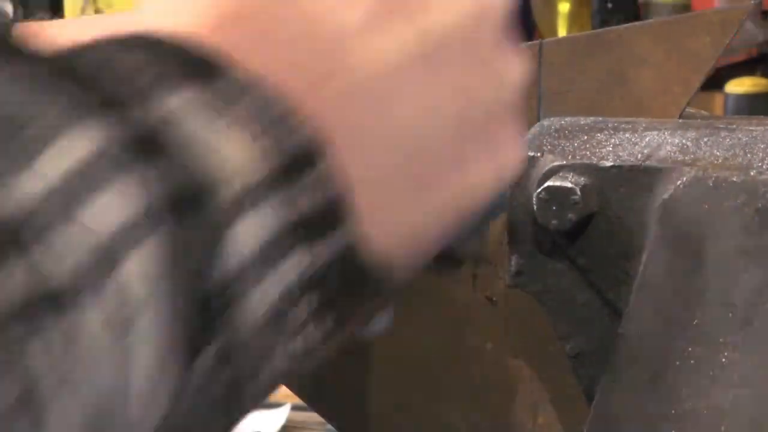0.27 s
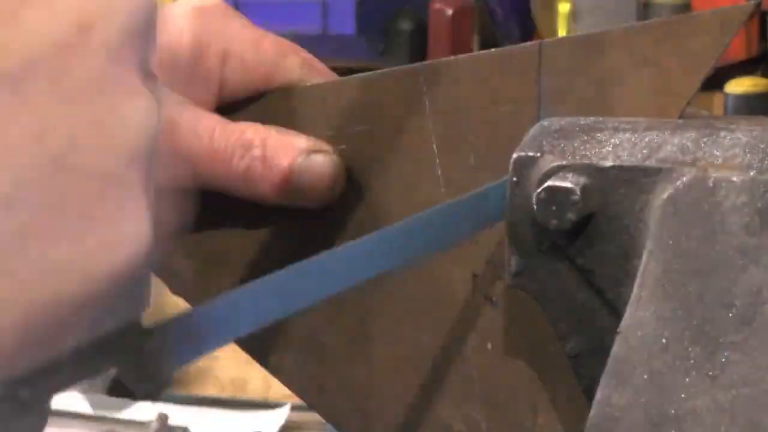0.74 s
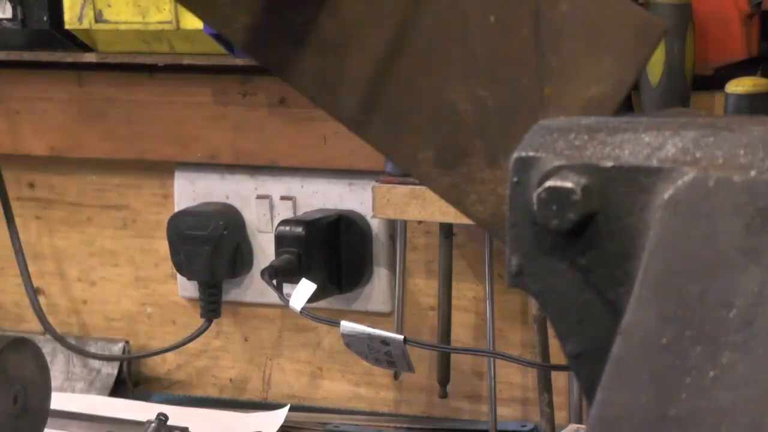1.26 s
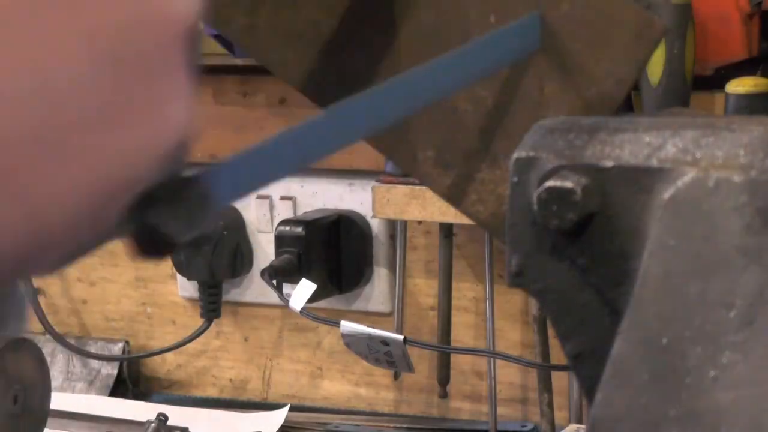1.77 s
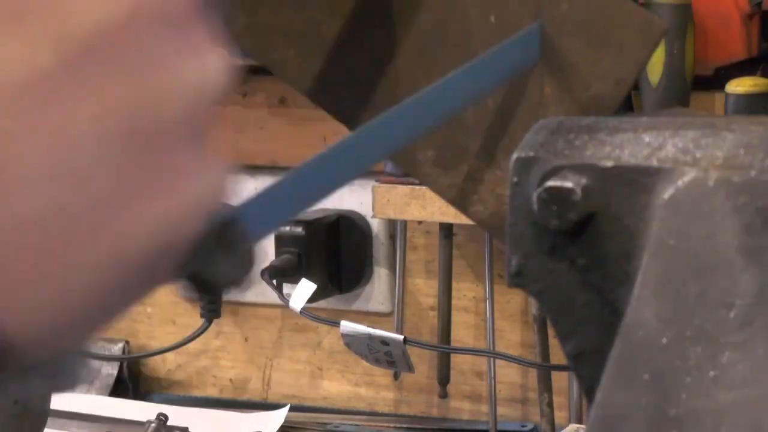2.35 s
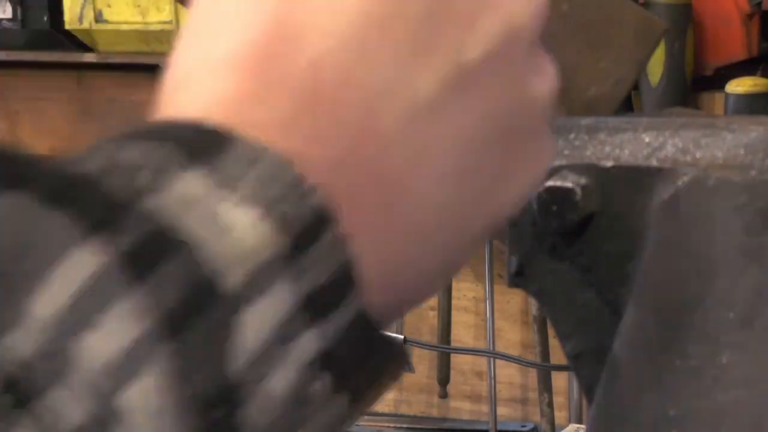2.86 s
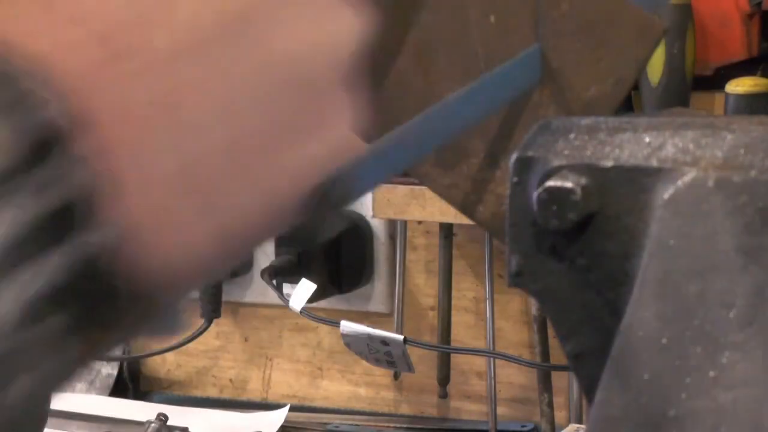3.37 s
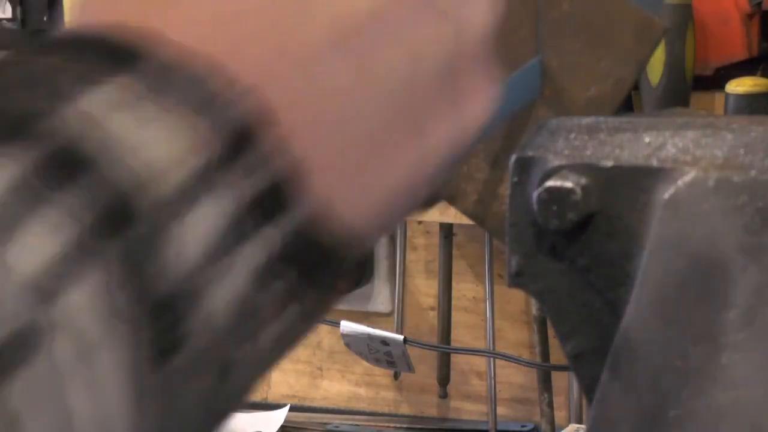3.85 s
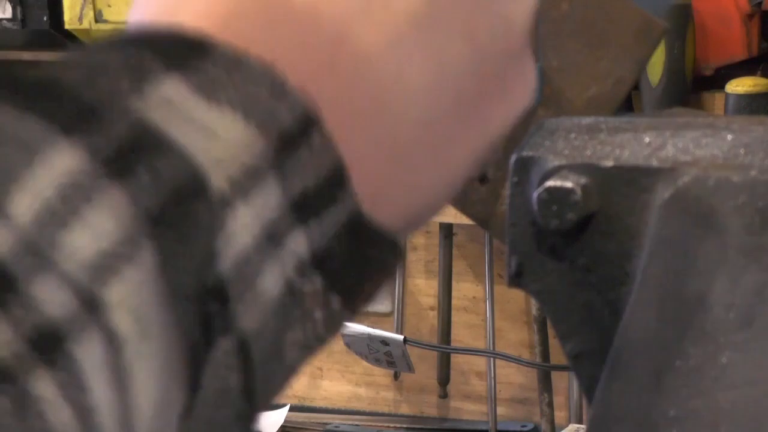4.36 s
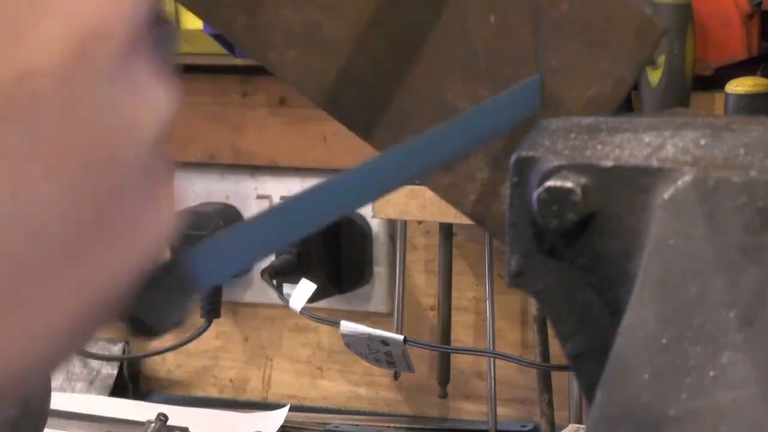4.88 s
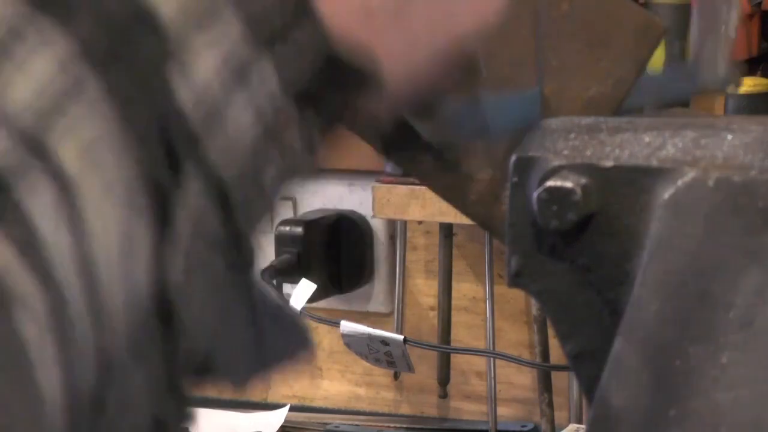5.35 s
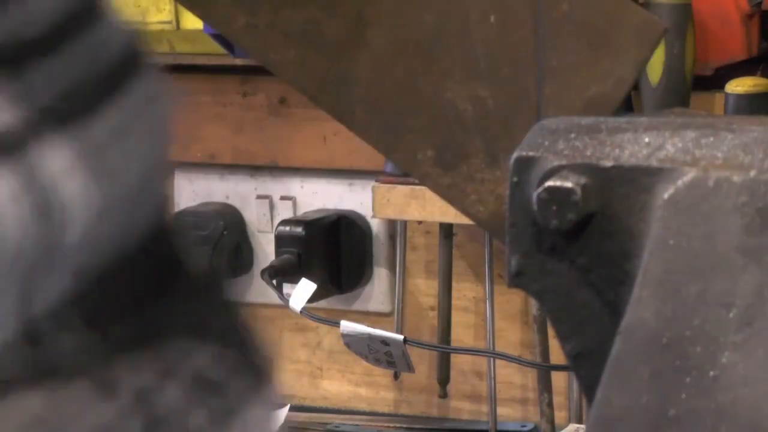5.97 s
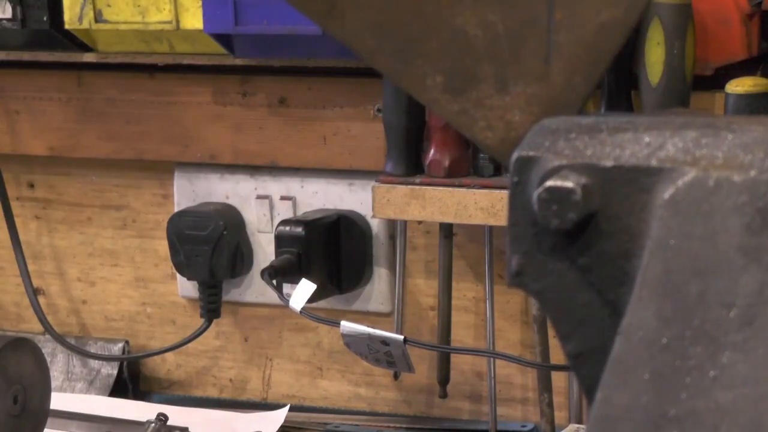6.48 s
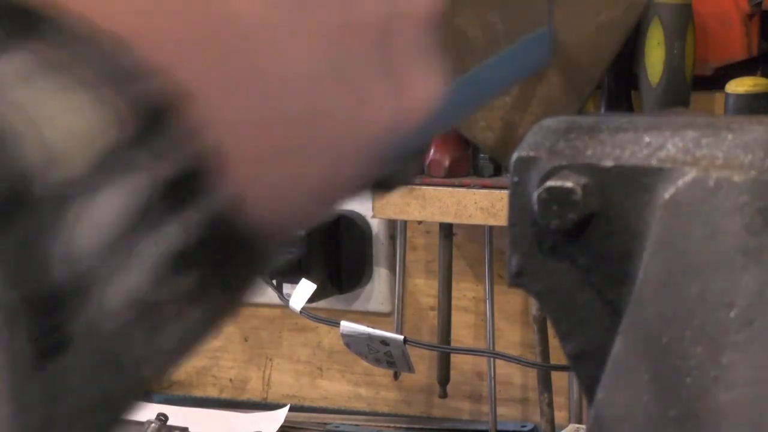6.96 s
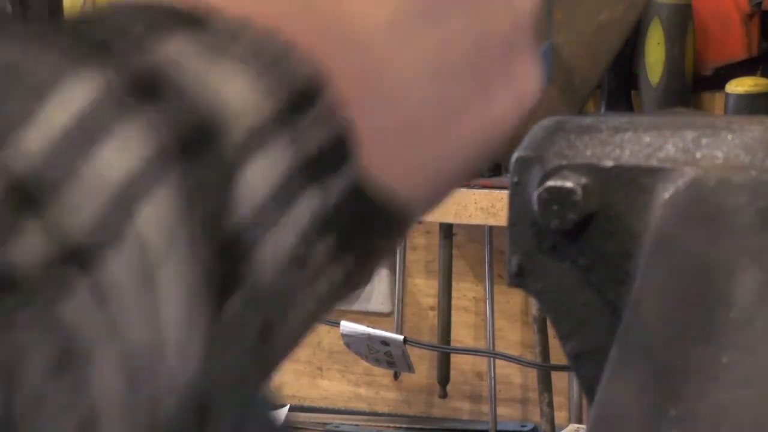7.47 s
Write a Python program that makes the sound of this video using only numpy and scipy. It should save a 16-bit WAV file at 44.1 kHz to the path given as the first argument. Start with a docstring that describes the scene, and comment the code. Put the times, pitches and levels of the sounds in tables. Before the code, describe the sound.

A hacksaw cuts steel plate in very fast, sped-up rasping strokes with metallic ringing, pausing twice for light knocks.

```python
"""A hacksaw cuts a steel plate held in a vise, in sped-up back-and-forth strokes, about 32 a second.
The teeth rasp; their friction makes blade and plate sing in modes that shift as the cut deepens,
and the blade squeals where it catches. Between cuts the steel is knocked about or left to ring,
with soft sleeve rustles and faint clicks. Heard from close by in a small, quiet workshop."""
import sys
import numpy as np
from scipy import signal
from scipy.fft import rfft, irfft
from scipy.io import wavfile
from scipy.ndimage import uniform_filter1d

SR = 44100
rng = np.random.default_rng(int(sys.argv[2]) if len(sys.argv) > 2 else 0)


def bounce(signal):
    """Save signal as a 16-bit WAV file at the path given by the first command-line argument."""
    frames = np.transpose(np.atleast_2d(signal))
    limited = np.clip(frames, -1, 1)
    pcm = np.round(limited * 32767).astype(np.int16)
    wavfile.write(sys.argv[1], SR, pcm)


N = 340452
TIME = np.arange(N) / SR
FREQS = np.arange(N // 2 + 1) * SR / N


def undb(db):
    """Decibels to gain."""
    return 10 ** (np.asarray(db) / 20)


def unit(x):
    """Scale to rms 1."""
    return x / np.sqrt(np.mean(np.abs(x) ** 2))


def along(points):
    """Interpolate (frequency [Hz], value) rows over log frequency."""
    hz, value = np.transpose(points)
    return np.interp(np.log(FREQS + 1), np.log(hz), value)


def colour(x, spectrum):
    """Filter by a spectrum, to rms 1."""
    return unit(irfft(rfft(x) * undb(along(spectrum)), N))


def noise():
    """White noise."""
    return rng.standard_normal(N)


def walk(rate_hz):
    """Smooth random drift, rms 1."""
    size = max(int(SR / rate_hz), 1)
    return unit(uniform_filter1d(uniform_filter1d(noise(), size), size))


def linger(force, fall_s):
    """Envelope whose stored power falls 30 dB in fall_s."""
    keep = np.exp(-np.log(1000) / (fall_s * SR))
    return np.sqrt(signal.lfilter([1 - keep], [1, -keep], force ** 2))


def swells(times_s, lengths_s, levels_db, rise_shape=2.9, fall_shape=2.6):
    """Envelope of rounded pushes; length is the time above half power."""
    power = np.zeros(N)
    for s, length, db in zip(times_s, lengths_s, levels_db):
        near = slice(max(int((s - 3 * length) * SR), 0), int((s + 3 * length) * SR))
        away = 2 * (TIME[near] - s) / length
        shape = np.where(away < 0, rise_shape, fall_shape)
        power[near] += undb(db) ** 2 * .5 ** (np.abs(away) ** shape)
    return np.sqrt(power)


def resonate(x, hz, width_hz):
    """Damped mode, gain 1 at its centre."""
    return signal.lfilter(*signal.iirpeak(hz, hz / width_hz, fs=SR), x)


def friction_mode(hz, width_hz, lock, smooth_samples=110):
    """Friction-fed mode, hz given per sample: the phase wanders; lock (0-1) evens the amplitude."""
    pole = np.exp(-np.pi * width_hz / SR)
    drive = rng.standard_normal(len(hz)) + 1j * rng.standard_normal(len(hz))
    phasor = signal.lfilter([1], [1, -pole], drive)
    phasor = uniform_filter1d(phasor / np.abs(phasor) ** lock, smooth_samples)
    return unit(np.real(phasor * np.exp(2j * np.pi * np.cumsum(hz) / SR)))


# stroke timing per spell of sped-up sawing: (time [s], stroke number)
OPENING = [(0.025, 0), (0.81, 24), (0.968, 29)]
LEAD_IN = [(1.825, 0), (1.915, 3)]
LONG_RUN = [(1.986, 1), (2.385, 14), (2.863, 30), (3.316, 46), (3.491, 52), (3.806, 62), (4.11, 72)]
SECOND_RUN = [(4.231, 0), (4.301, 2), (5.159, 30), (5.475, 40), (5.528, 42)]
SHORT_RUN = [(5.66, 0), (5.977, 10), (6.008, 11)]
CLOSING = [(7.096, 0), (7.204, 4), (7.706, 21)]
# spells: (timing, nominal push [s], nominal pull [s], pull lead [s],
# pull over push in rasp [dB], in low tone [dB], in upper ring [dB])
SPELLS = [(OPENING, 0.016, 0.01, 0.0058, 5, 15.7, 6.7), (LEAD_IN, 0.015, .015, 0.0011, 1.1, -0.5, 0.98),
          (LONG_RUN, 0.015, 0.012, 0.00089, 2.9, 1.7, 0.53),
          (SECOND_RUN, 0.016, 0.013, 0.0031, 2.1, -1.4, 0.88),
          (SHORT_RUN, 0.015, 0.015, 0.0038, 4.3, 2.5, 0), (CLOSING, .014, 0.012, .002, 0.46, 20.7, 0.6)]
# bearing down and easing: (time [s], rasp drive [dB], low tone drive [dB], upper ring drive [dB])
EFFORT = [(0.02, -47, -61.5, -38), (0.25, -47.5, -55.5, -36.5), (0.65, -43, -55.5, -33),
          (0.87, -48.5, -54, -36), (0.97, -53.0, -66, -46.5), (1.81, -48.5, -31, -41),
          (1.92, -41, -39, -39.5), (1.98, -45, -37, -39), (2.25, -44.5, -37.0, -39.5),
          (2.5, -46.0, -33, -38.5), (2.65, -46.5, -38.5, -40.5), (3.1, -44.5, -36.5, -39.5),
          (3.299, -44, -37.5, -37.0), (3.479, -45.5, -38, -32.5), (3.8, -44, -38, -31),
          (4.11, -45.5, -42, -32.5), (4.22, -44.5, -46.5, -34), (4.4, -45.5, -43.5, -30),
          (4.6, -42.5, -39, -31), (4.95, -44.5, -37.5, -34), (5.25, -48.5, -34.5, -32.5),
          (5.42, -45.5, -42.5, -37), (5.531, -46, -39, -35), (5.65, -45, -41, -32),
          (5.801, -48.5, -46, -31), (6.01, -40.5, -45.5, -36.5), (7.09, -43, -54, -36.5),
          (7.22, -43, -52, -31.0), (7.4, -44, -63.5, -33.5), (7.71, -45, -57, -37)]


def strokes(timing, push_s, pull_s, lead_s, *accents_db, jitter_s=0.00089, length_spread=0.11):
    """One spell of pushes (even) and pulls (odd), no two alike; rows as in TOUCHES."""
    times, numbers = np.transpose(timing)
    number = np.arange(numbers[0], numbers[-1] + 1)
    pull = number % 2
    late, longer, *harder = rng.standard_normal(size=(len(number), 5)).T
    centre_s = np.interp(number, numbers, times) - lead_s * pull + jitter_s * late
    length_s = np.where(pull, pull_s, push_s) * np.exp(length_spread * longer)
    effort_s, *efforts_db = np.transpose(EFFORT)
    spreads_db = 0.86, 3, 1.4  # rasp, low tone, upper ring
    drives_db = [np.interp(centre_s, effort_s, effort) + accent * (pull - .5) + spread * chance
                 for effort, accent, spread, chance in zip(efforts_db, accents_db, spreads_db, harder)]
    return np.transpose([centre_s, length_s, *drives_db])


# blade being set into the cut:
# (centre [s], nominal length [s], rasp drive [dB], low tone drive [dB], upper ring drive [dB])
TOUCHES = [(1.575, 0.009, -40.5, -33, -46), (1.658, 0.0075, -67.5, -48.5, -62.5),
           (1.788, 0.0046, -50, -37, -55), (1.968, 0.011, -52, -46, -46),
           (6.968, 0.011, -46.5, -48.5, -36.5), (7.004, 0.0081, -52.5, -43, -32.5),
           (7.065, 0.0069, -39.5, -52, -41)]


def sawing(stroke_rows, judder_db=1.33, judder_hz=130):
    """Strokes and touches drive rasp and modes; the blade judders as its teeth catch and slip."""
    centre_s, length_s, rasp_db, low_db, ring_db = np.vstack([stroke_rows, TOUCHES]).T
    judder = unit(undb(judder_db * walk(judder_hz)))
    scrape = rasp(judder * swells(centre_s, 1.08 * length_s, rasp_db))
    low = low_tone(swells(centre_s, length_s, low_db))
    ring = upper_ring(judder * swells(centre_s, 1.03 * length_s, ring_db))
    return scrape + low + ring + plate(scrape)


# teeth on steel: (frequency [Hz], relative density [dB])
RASP_SPECTRUM = [(40, -11), (120, -3), (350, 1), (520, 2), (750, 10), (1100, 5.5), (1500, 5), (3500, 9.5),
                 (5500, 7.5), (8000, 1.5), (12000, 2), (16000, -1)]


def rasp(force, grit_db=3.5, chips_per_s=900, chip_db=-9, patchy_db=2.5, tail_db=-12, gain_db=7):
    """Teeth tear the steel: uneven grinding, snaps as chips break off, a flickering colour."""
    grind = unit(noise() * undb(grit_db * walk(500)))
    chips = unit(noise() * (rng.random(N) < chips_per_s / SR))
    spectrum = rfft(colour(grind + undb(chip_db) * chips, RASP_SPECTRUM))
    octave = np.clip(np.log2(FREQS / 600 + 1e-9), 0, 4)
    bands = [irfft(spectrum * np.maximum(1 - np.abs(octave - k), 0), N) for k in range(5)]
    bite = unit(sum(band * undb(patchy_db * walk(60)) for band in bands))
    tail = undb(tail_db) * linger(force, fall_s=0.027) * colour(noise(), RASP_SPECTRUM)
    return undb(gain_db) * (force * bite + tail)


# bending mode of the long cut: (time [s], pitch [Hz])
BENDING_PITCH = [(1.55, 977.4), (2.1, 951), (3.0, 938.6), (3.55, 923.4), (3.8, 965), (4.05, 997),
                 (4.5, 972), (5.0, 965), (5.5, 936), (6.0, 907)]


def low_tone(force, long_from_s=1.2, long_to_s=6.5, growl_db=-4, gain_db=4):
    """The long cut excites a strong, rough bending mode; the short cuts give only a dull growl."""
    pitch_hz = np.interp(TIME, *np.transpose(BENDING_PITCH))
    tone = friction_mode(pitch_hz, width_hz=42, lock=.65, smooth_samples=190)
    growl = friction_mode(np.full(N, 860.), width_hz=270, lock=0.16, smooth_samples=50)
    long_cut = (TIME > long_from_s) & (TIME < long_to_s)
    voice = np.where(long_cut, tone, undb(growl_db) * growl)
    return undb(gain_db) * voice * linger(force, fall_s=0.014)


# upper modes of blade and plate: (frequency [Hz], nominal width [Hz], relative density [dB])
FIRST_CUT = [(1846, 57, 7.5), (2466, 87, -5), (3574, 550, -8), (4480, 170, -3.5), (4960, 28, -8),
             (5240, 75, -8.5)]
SHALLOW = [(1277, 570, -10), (2363, 100, 3.5), (3440, 135, -1.5), (3770, 140, 4), (4860, 130, 5),
           (6400, 250, -5), (7640, 370, -4), (9700, 250, -16), (12500, 180, -15.5)]
HALFWAY = [(2303, 47, -10.5), (3764, 44, -13.5), (3990, 42, -8), (4600, 110, -13.5), (6220, 120, -21),
           (6850, 88, -31.5), (9940, 1500, -43), (12320, 250, -45.5)]
DEEP = [(1550, 130, -33), (2293, 70, -8), (2750, 27, -15), (3760, 25, -3), (3970, 60, 1),
        (4560, 64.3, -3.5), (6035, 130, -8), (7200, 130, -20), (9560, 220, -21.5), (11600, 130, -22),
        (12700, 160, -24)]
NEARLY_THROUGH = [(2247, 49, -10), (2930, 14, -12), (3370, 83, -10.5), (3760, 40, -3), (3980, 69, 1.5),
                  (4527, 64, -4.5), (5590, 200, -15), (6720, 310, -19), (8980, 126, -17.5),
                  (9850, 98, -17.5), (11900, 435, -26.5)]
LAST_CUT = [(1580, 100, -10.5), (2224, 35, -1.5), (2990, 76, 1), (4063, 38, 2), (6000, 340, -22.5),
            (9030, 370, -23.5), (9440, 140, -16.5)]
# stages of the cut: (start [s], end [s], modes)
STAGES = [(0, 1.2, FIRST_CUT), (1.2, 3.3, SHALLOW), (3.3, 4.18, HALFWAY), (4.18, 5.05, DEEP),
          (5.05, 6.5, NEARLY_THROUGH), (6.5, 7.8, LAST_CUT)]


def upper_ring(force, width_scale=0.91, sag_hz_per_s=30, rivalry_db=4.5, rivalry_hz=70, gain_db=2):
    """Each stage's modes vie for the stroke's energy and sink as the kerf lengthens."""
    out = np.zeros(N)
    for start_s, end_s, modes in STAGES:
        crossfade = uniform_filter1d(1. * ((TIME >= start_s) & (TIME < end_s)), size=SR // 5)
        near = crossfade > 1e-6
        t = TIME[near]
        knots_s = np.arange(t[0], t[-1], 1 / rivalry_hz)
        sag_hz = sag_hz_per_s * (t - t.mean())
        voice, power = 0, 0
        for hz, width_hz, db in modes:
            grips = undb(db + rivalry_db * rng.standard_normal(len(knots_s))) * np.sqrt(width_hz)
            grip = np.interp(t, knots_s, grips)
            voice += grip * friction_mode(hz - sag_hz, width_scale * width_hz, lock=0.05)
            power += grip ** 2
        out[near] += voice * np.sqrt(crossfade[near] / power)
    return undb(gain_db) * out * linger(force, fall_s=0.011)


# blade catches: (time [s], pitch [Hz], relative level [dB])
SQUEALS = [(0.513, 1870, -32), (3.503, 2302, -24.5), (3.565, 2311, -24), (3.592, 3970, -32),
           (3.692, 2295, -28), (3.757, 2270, -24), (4.329, 3950, -27), (4.736, 1570, -36),
           (4.801, 1560, -39), (4.864, 1570, -34.5), (4.915, 4070, -28.5), (4.945, 4055, -31.5),
           (5.856, 1600, -40), (5.902, 2910, -31.5), (7.156, 2844, -24), (7.262, 2960, -23.5),
           (7.288, 2974, -29), (7.323, 2934, -25), (7.623, 4010, -24.5)]


def squeals(length_s=0.0089, gain_db=-2):
    """For part of a stroke the blade locks onto a single mode."""
    tones = sum(swells([s], [length_s], [db]) * np.sin(2 * np.pi * hz * TIME) for s, hz, db in SQUEALS)
    return undb(gain_db) * np.sqrt(2) * tones


# plate, saw and vise handled: (time [s], thud pitch [Hz], thud level [dB], contact drive [dB])
KNOCKS = [(1.033, 271, -41, -52.5), (1.052, 415, -50, -46), (1.066, 600, -42.5, -46),
          (1.248, 201, -36.5, -45), (1.271, 242, -36.5, -39), (1.293, 380, -40, -34.5),
          (1.521, 380, -67, -47.5), (1.554, 332, -46.5, -58), (3.328, 383, -37.5, -41.5),
          (6.099, 460, -38.5, -41.5), (6.108, 443, -43, -46), (6.133, 340, -41, -43),
          (6.21, 545, -46, -41.5), (6.219, 537, -37, -54), (6.227, 188, -44.5, -59),
          (6.284, 189, -47.5, -61), (6.415, 576, -55, -77), (6.714, 197, -45, -51),
          (6.727, 230, -39.5, -39.5), (6.756, 267, -52, -45), (6.796, 282, -34.5, -44),
          (6.821, 443, -38, -44.5), (6.927, 346, -47, -46.5), (6.971, 375, -30, -37.5),
          (7.008, 416, -33, -35), (7.023, 358, -34, -44.5)]
# contact noise: (frequency [Hz], relative density [dB])
CLACK_SPECTRUM = [(50, -7), (200, 9), (700, -1.5), (1500, -3), (4000, -13), (6000, -12.5), (9000, -17.5),
                  (16000, -20.5)]
# clamped steel: (frequency [Hz], width [Hz], relative level [dB])
CLINK_MODES = [(720, 150, -2.5), (1123, 170, -3.5), (1480, 200, -2), (2250, 37, 1.5), (2810, 140, -7),
               (3540, 450, 9.5), (4460, 240, 8), (6310, 100, 5)]


def knocks(contact_s=0.0011, scuff_s=0.012, scuff_db=-12, thud_rise_s=0.0037, clack_db=-4, clink_db=1):
    """A sharp contact within a brief scuff: the bench thuds, the steel rings in a new mix each blow."""
    out = np.zeros(N)
    grit = colour(noise(), CLACK_SPECTRUM)
    blow_energy = .005 * SR  # 5 ms at rms 1
    for s, thud_hz, thud_db, drive_db in KNOCKS:
        near = slice(int(s * SR) - SR // 20, int(s * SR) + SR // 10)
        lag_s = TIME[near] - s
        away_s = np.where(lag_s < 0, -2 * lag_s, lag_s)  # builds faster than it dies
        scuff = undb(scuff_db) * np.exp(-away_s / scuff_s)
        clack = grit[near] * (np.exp(-np.abs(lag_s) / contact_s) + scuff)
        clink = sum(undb(db + 4 * rng.standard_normal()) * resonate(clack, hz, width_hz)
                    for hz, width_hz, db in CLINK_MODES)
        for part, db in (clack, clack_db), (clink, clink_db):
            out[near] += undb(drive_db + db) * part * np.sqrt(blow_energy / np.sum(part ** 2))
        swing = np.maximum(lag_s / thud_rise_s + .7, 0)
        thud_envelope = (swing * np.exp(1 - swing)) ** 2
        out[near] += undb(thud_db) * thud_envelope * np.sin(2 * np.pi * thud_hz * lag_s)
    return out


# soft sleeve rustles and faint bright clicks of handled steel: (centre [s], length [s], level [dB])
RUSTLES_AND_CLICKS = [(1.054, 0.033, -47.5), (1.113, 0.014, -48), (6.107, 0.015, -55), (6.16, 0.011, -54.5),
                      (6.585, 0.0038, -62.5), (1.19, 0.088, -70.5), (6.289, 0.019, -66)]
# soft rubs along plate and saw: (centre [s], length [s], level [dB])
RUBS = [(1.19, 0.083, -64), (1.381, .03, -70), (1.511, 0.047, -58), (6.335, 0.016, -68),
        (6.457, 0.052, -72), (6.665, 0.064, -67.5)]
# soft rub: (frequency [Hz], relative density [dB])
RUB_SPECTRUM = [(200, -5), (550, -3), (800, -7), (1150, -1), (1500, -1.5), (2000, -17), (5000, -18),
                (14000, -31)]


def handling(patchy_db=3):
    """Soft sleeve rustles and faint bright clicks of handled steel, with slower, dull rubs."""
    uneven = noise() * undb(patchy_db * walk(200))
    bright = colour(uneven, [(300, -3), (3000, -4), (14000, -4)])
    dull = colour(noise(), RUB_SPECTRUM)
    return bright * swells(*np.transpose(RUSTLES_AND_CLICKS)) + dull * swells(*np.transpose(RUBS))


# free plate: (frequency [Hz], relative level [dB], t60 [s])
PLATE_MODES = [(385, -11, 0.15), (658, -0.5, 0.81), (1553, -5, 0.81), (2210, -2.5, 0.1113), (2906, 3, 0.21)]
# blade leaves the cut: (time [s], kick [dB])
RELEASES = [(4.125, -56.5), (5.535, -71), (6.015, -43.5)]


def plate(scrape, shake_db=4.02, held_width_hz=55, grab_s=6.1):
    """Strokes shake the plate more as it loosens; freed of the blade, it rings until grabbed."""
    looseness = np.interp(TIME, [3, 4.7, grab_s, grab_s + .02], [0, 1, 1, 0])
    shaken = sum(undb(db) * resonate(scrape, hz, held_width_hz) for hz, db, _ in PLATE_MODES)
    age_s = TIME[:SR // 2]
    ring = sum(undb(db - 60 * age_s / t60_s) * np.sin(2 * np.pi * hz * age_s)
               for hz, db, t60_s in PLATE_MODES)
    kicks = np.zeros(N)
    for s, db in RELEASES:
        kicks[int(s * SR)] += undb(db)
    return looseness * (undb(shake_db) * shaken + signal.fftconvolve(kicks, ring)[:N])


def reflections(x, t60_s=0.12):
    """Dense, quick echoes off bench and wall, at unit power gain."""
    age_s = TIME[:SR // 5]
    echoes = rng.standard_normal(len(age_s)) * undb(-60 * age_s / t60_s)
    return signal.fftconvolve(x, echoes / np.sqrt(np.sum(echoes ** 2)))[:N]


# stereo balance: (frequency [Hz], left minus right [dB])
BALANCE = [(60, -5), (200, -4.5), (400, -9.5), (950, -8), (1800, -15), (2350, -14), (4400, -7), (8000, -6),
           (15000, -3.5)]
# stereo phase: (frequency [Hz], left lead [rad])
PHASE_LEAD = [(200, 0), (950, -1.4), (1550, 1.0), (2000, .3), (2350, 1.5), (2900, -.7), (3700, .3),
              (4000, -1.1), (4570, .6), (4850, -.6), (5400, 0)]
# room hush: (frequency [Hz], relative density [dB])
HUSH_SPECTRUM = [(25, -1.5), (60, -2.5), (280, -0.5), (600, -6.5), (1500, -17), (2200, -25), (4000, -21),
                 (7000, -35), (12000, -21), (16000, -32.5)]


def workshop(x, wet_db=-19, hush_db=-72):
    """Direct sound from the right, plus reflections and a faint hush."""
    tilt = undb(along(BALANCE) / 2) * np.exp(.5j * along(PHASE_LEAD))
    left_right = np.array([tilt, 1 / tilt]) / np.abs((tilt + 1 / tilt) / 2)
    direct = irfft(rfft(x) * left_right, N)
    wet = np.array([reflections(x) for _ in range(2)])
    common_hush = colour(noise(), HUSH_SPECTRUM)
    hush = common_hush + np.array([colour(noise(), HUSH_SPECTRUM) for _ in range(2)])
    return direct + undb(wet_db) * wet + undb(hush_db) * hush


def scene(side_db=-7):
    """Sawing and handling; blade and plate are wide, so part of their sound differs left to right."""
    stroke_rows = np.vstack([strokes(*spell) for spell in SPELLS])
    side = sawing(stroke_rows) + knocks() + handling()  # same events, independent noise
    work = sawing(stroke_rows) + squeals() + knocks() + handling()
    return workshop(work) + undb(side_db) * np.array([side, -side])


def record(dry, cutoff_hz=15950):
    """Steep elliptic low-pass."""
    return signal.sosfilt(signal.ellip(10, .2, 80, cutoff_hz, fs=SR, output="sos"), dry)


dry = scene()
out = record(dry)
bounce(out)
```